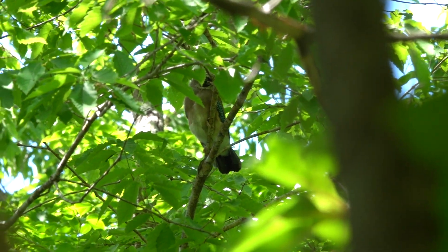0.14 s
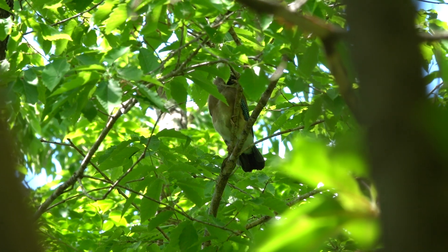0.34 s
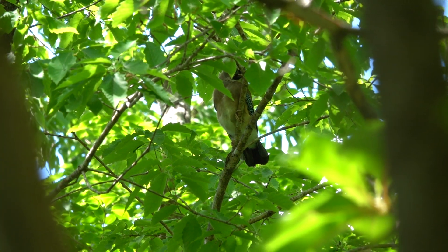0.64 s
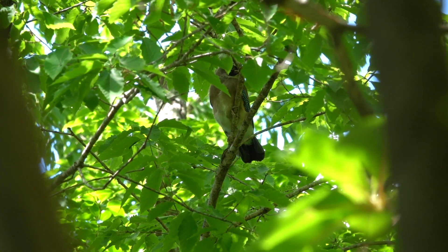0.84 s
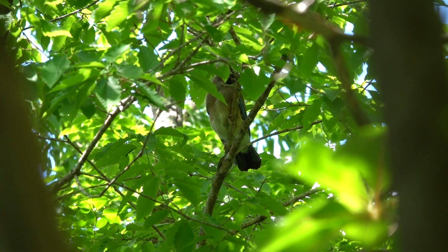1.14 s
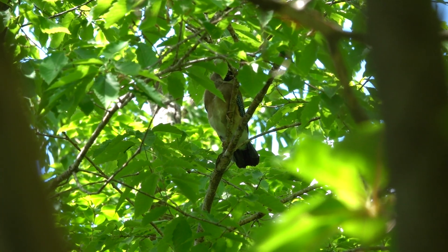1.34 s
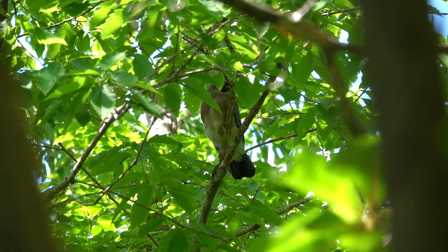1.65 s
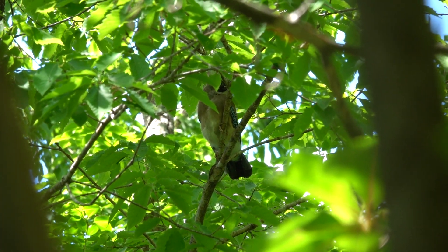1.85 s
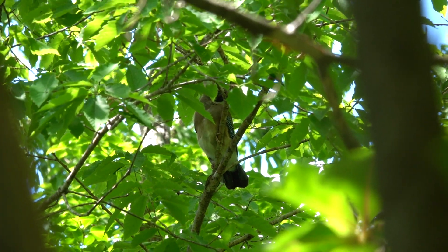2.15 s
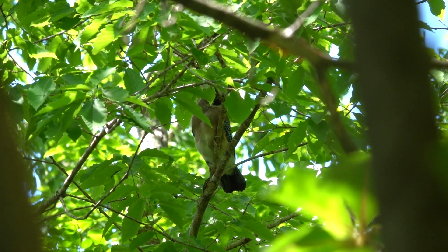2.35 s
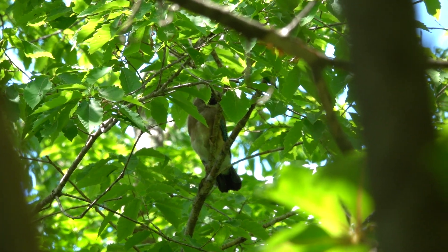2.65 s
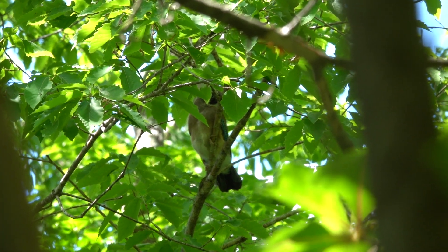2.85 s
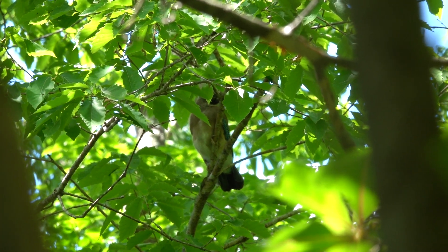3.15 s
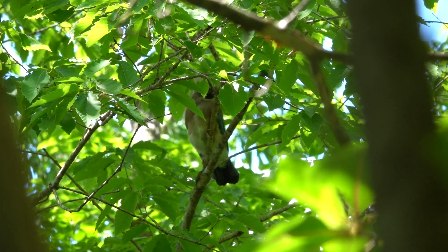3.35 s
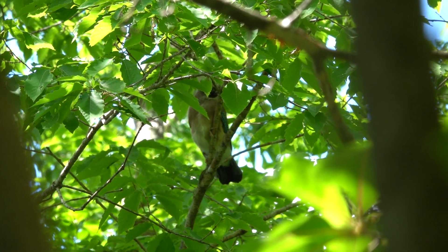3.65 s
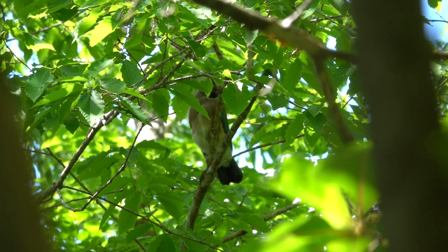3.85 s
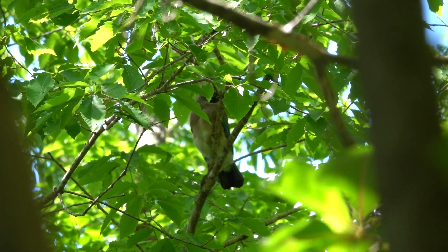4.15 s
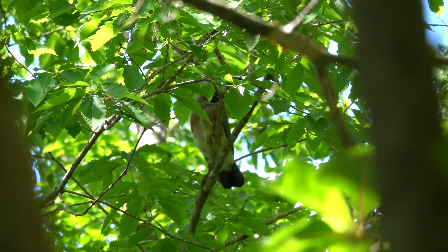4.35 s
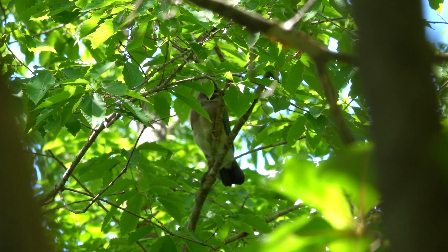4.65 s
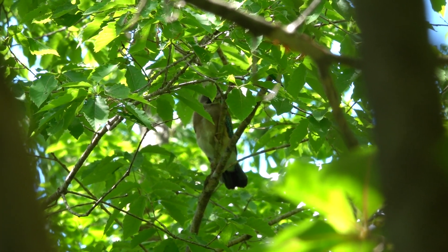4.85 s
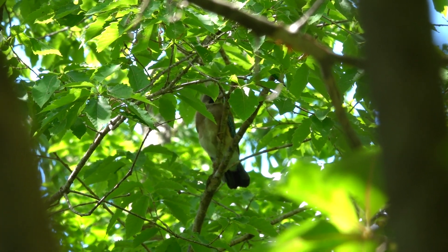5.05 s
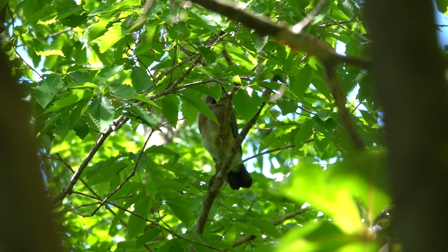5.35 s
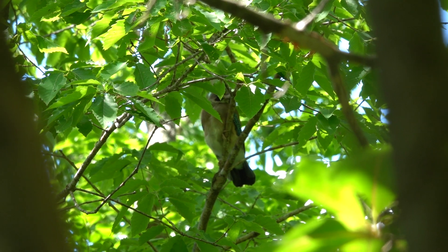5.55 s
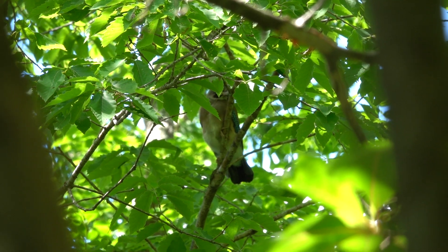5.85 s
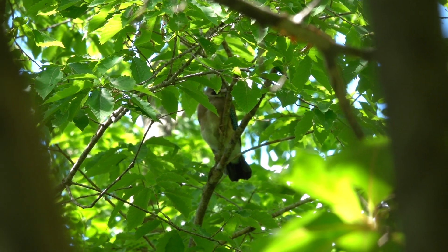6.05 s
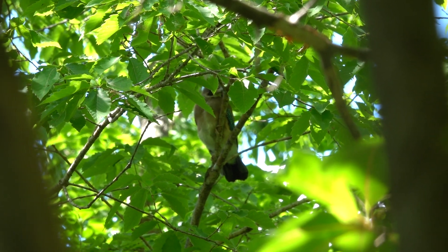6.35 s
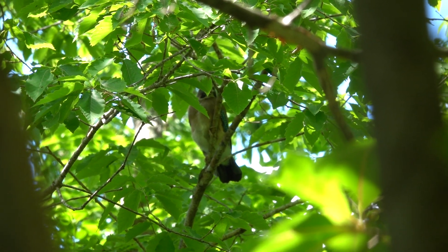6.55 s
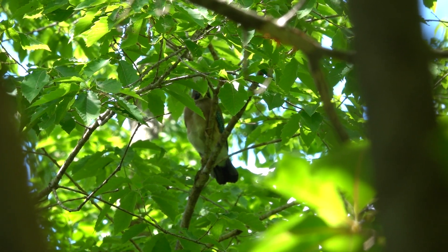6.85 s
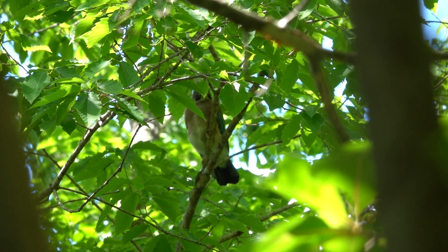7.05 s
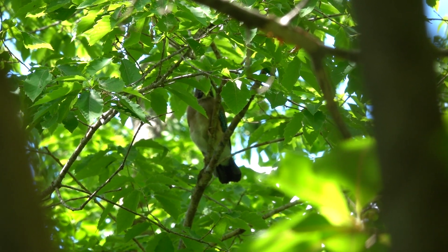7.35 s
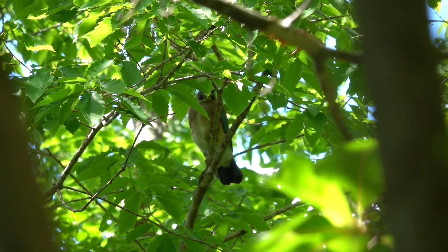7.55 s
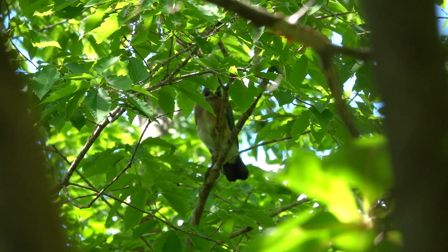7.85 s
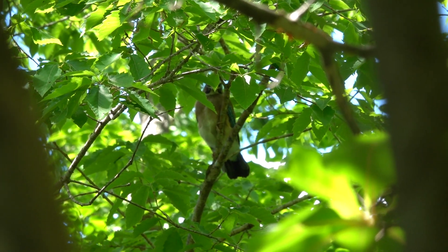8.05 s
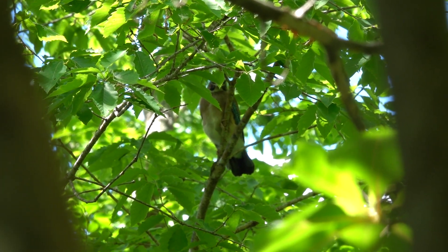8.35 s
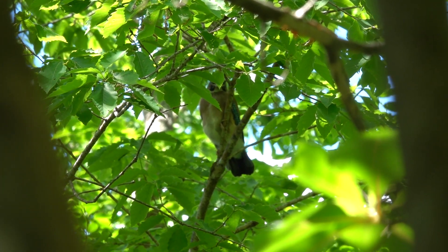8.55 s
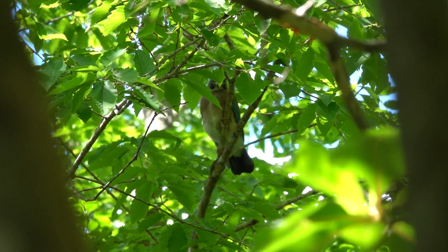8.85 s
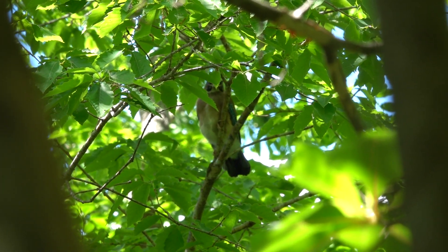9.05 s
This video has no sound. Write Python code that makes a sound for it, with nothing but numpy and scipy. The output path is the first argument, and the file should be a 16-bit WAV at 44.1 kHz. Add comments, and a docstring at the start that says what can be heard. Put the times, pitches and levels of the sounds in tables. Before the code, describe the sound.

A buzzing, throbbing cicada chorus fills the trees, strongest in the first five seconds, with thin far whistles and tiny bird chips behind.

```python
"""In a leafy wood, cicadas drone: two throb in the nearest trees and fade, a chorus carries on behind them.
Each song is a train of uneven clicks; bands of noise add its toneless rasp and a fine high sizzle.
Thin far whistles and a small bird's chips are short tones with a jittery pitch.
Scattered echoes from trunks and leaves smear cicadas, chorus, whistles and bird.
Shaped noise makes the drone of far insects, a faint outdoor rumble, a hum, soft low swells and a tick."""
import sys
import numpy as np
from scipy import signal
from scipy.fft import rfft, irfft, next_fast_len
from scipy.io import wavfile

SR = 44100
rng = np.random.default_rng(int(sys.argv[2]) if len(sys.argv) > 2 else 0)


def to_wav(sig):
    """Store sig (one row per channel, or 1-D mono) as 16-bit WAV at the path in sys.argv[1].

    Samples outside -1..1 are clipped; the rate is SR.
    """
    pcm = np.clip(np.atleast_2d(sig), -1, 1) * 32767
    pcm = np.round(pcm).astype(np.int16)
    wavfile.write(sys.argv[1], SR, pcm.T)  # frames by channels


N = 406161
T = np.arange(N) / SR  # time of every sample, in seconds


def undb(db):
    """Turn decibels into a plain gain."""
    return 10 ** (np.asarray(db) / 20)


def unit(x):
    """Scale to an average (rms) level of 1."""
    return x / np.sqrt(np.mean(x ** 2))


def curve(rows, axis=1):
    """One column of a table, joined by straight lines in time."""
    rows = np.array(rows)
    return np.interp(T, rows[:, 0], rows[:, axis])


def walk(rate):
    """Smooth random wandering around 0, about rate new values a second, with a spread near 1."""
    points = rng.standard_normal(N // 8)
    return 1.2 * np.interp(T * rate, np.arange(len(points)), points)


def cycle(hz):
    """Running phase, in radians, of a changing frequency."""
    return 2 * np.pi * np.cumsum(hz) / SR


def spread(pair, side_db):
    """Two unrelated signals as middle and side of a stereo pair."""
    middle, side = pair
    return middle + undb(side_db) * side * np.array([[1], [-1]])


def noise(gain, side_db):
    """Stereo noise of average level 1 whose spectrum is gain(Hz)."""
    size = next_fast_len(N, real=True)
    hz = np.maximum(np.fft.rfftfreq(size, 1 / SR), 1)
    spectrum = rfft(rng.standard_normal((2, size))) * gain(hz)
    pair = irfft(spectrum, size)[:, :N]
    return unit(spread(pair, side_db))


def coloured(points, side_db):
    """Noise whose spectrum joins (Hz, dB) points by straight lines over log frequency."""
    hz, db = np.transpose(points)
    return noise(lambda f: undb(np.interp(np.log(f), np.log(hz), db, left=-60, right=-60)), side_db)


def band(hz, width_hz, side_db):
    """Noise in one steep resonance."""
    return noise(lambda f: 1 / (1 + ((f - hz ** 2 / f) / width_hz) ** 2), side_db)


def swell(start, length, edge):
    """Samples of a note, its progress 0-1 and an envelope whose edges soften as edge grows."""
    at = np.flatnonzero((T > start) & (T < start + length))
    progress = (T[at] - start) / length
    return at, progress, np.abs(np.sin(np.pi * progress)) ** edge


def balance(db):
    """Left and right gains for a level difference (left minus right)."""
    return undb(db * np.array([[.5], [-.5]]))


def woods(x, t60, direct_db, side_db):
    """The straight path plus a dense scatter from trunks and leaves that dies by 60 dB in t60 seconds."""
    t = T[:SR]
    echo = spread(rng.standard_normal((2, SR)), side_db) * undb(-60 * t / t60)
    echo /= np.sqrt(np.sum(echo ** 2) / 2)
    echo[:, 0] += undb(direct_db)  # straight path, measured against the scatter
    echo /= np.sqrt(np.sum(echo ** 2) / 2)
    lead_in = np.pad(x, (SR // 2, 0), mode="reflect")  # the wood is already ringing
    return signal.fftconvolve(lead_in[None], echo, axes=1)[:, SR // 2:SR // 2 + N]


# what a cicada's body radiates at 1, 2, 3 and 4 times the click rate, before leaves dull it: relative level_db
BODY_LEVELS = [-25.5, 2.5, -19.5, -23]


def cicada(hz, throb, stroke_hz, jitter, waver, dull_db,
           stroke_depth=0.48, stroke_bend=0.032, throb_db=1.0, throb_bend=0.0033):
    """Tymbal ribs buckle in a quick uneven train; each muscle stroke makes the clicks louder and faster."""
    stroke = np.cos(cycle(stroke_hz * (1 + .09 * walk(120))))
    uneven = jitter * walk(700) + waver * walk(40)
    ribs = cycle(hz * (1 + stroke_bend * stroke + uneven + throb_bend * throb))
    turn, partial, tone = np.exp(1j * ribs), 1, 0
    for k, db in enumerate(BODY_LEVELS):
        partial = partial * turn  # next multiple of the click rate
        leaf_loss_db = dull_db * max(k - 1, 0)  # leaves take more of each higher partial
        tone = tone + undb(db - leaf_loss_db) * partial.imag
    loudness = undb(throb_db * throb + 1.6 * walk(110))
    return unit(tone * (1 + stroke_depth * stroke) * loudness)


# how fast the near cicadas' abdomens pump: time_s, throb_rate_hz
PUMPING = [(0.0, 8.39), (0.6, 10.02), (1.2, 8.42), (3.6, 8.19), (4.8, 10.33), (5.2, 7.99)]
THROB_START = -.067  # where they are in their throb at first, in cycles


def near_throb():
    """The abdomen pumps about 8-10 times a second; the near cicadas keep in step."""
    return np.cos(cycle(curve(PUMPING)) + 2 * np.pi * THROB_START)


# the two near cicadas, one fading as the other swells: time_s, click_rate_hz, level_db (before the wood's echo)
FIRST_SINGER = [(0, 1414, -35), (1.5, 1418, -30.5), (2.1, 1424, -44), (2.8, 1443, -37), (5.2, 1420, -39)]
SECOND_SINGER = [(0, 1474, -34), (1.9, 1473, -34), (3, 1470, -29.7), (4, 1475, -24.8), (5.2, 1486, -37),
                 (9.2, 1480, -43)]


def near_cicadas(throb):
    """Two singers in the nearest crowns, each with its own click rate and muscle strokes."""
    first = cicada(curve(FIRST_SINGER), throb, stroke_hz=280, jitter=.014, waver=.006, dull_db=4)
    second = cicada(curve(SECOND_SINGER), throb, stroke_hz=288, jitter=.010, waver=.0045, dull_db=1)
    first = first * undb(curve(FIRST_SINGER, axis=2))
    second = second * undb(curve(SECOND_SINGER, axis=2))
    return woods(first + second, t60=.25, direct_db=0, side_db=-5)


# loudness of the whole chorus: time_s, level_db
CHORUS_LEVEL = [(0, -34), (2, -27.5), (4, -32), (5.5, -33.5), (9.2, -33)]
# the singers of the chorus, one number each: average click_rate_hz
CHORUS_CLICK_RATES = [1385, 1412, 1435, 1454, 1461, 1487, 1486, 1493.5, 1545]
THROB_HZ = 8.6  # average throbs a second in the chorus


def chorus():
    """Many singers further off, each clicking at its own wandering pitch and pulse."""
    song = 0
    for hz in CHORUS_CLICK_RATES:
        throb_rate = THROB_HZ * (1 + 0.1202 * walk(1.5))
        throb = np.cos(cycle(throb_rate) + rng.uniform(0, 2 * np.pi))
        pitch = hz * (1 + .003 * walk(1.2))
        song = song + cicada(pitch, throb, stroke_hz=263.3, jitter=.017, waver=.006, dull_db=5.0)
    song = woods(unit(song), t60=.6, direct_db=-7, side_db=-5.5)
    return song * undb(curve(CHORUS_LEVEL))


# the throb bites deepest at one moment: when, half-length and depth
PULSING_S, PULSING_WIDTH_S, PULSING_DB = 2.8, 0.77, 3


def pulsing(throb):
    """Swing in dB that the throb gives the treble: it deepens towards one moment and eases off."""
    return PULSING_DB * throb / (1 + ((T - PULSING_S) / PULSING_WIDTH_S) ** 2)


# loudness of the upper buzz, before RASP_DB is added: time_s, relative level_db
RASP_LEVEL = [(0.0, -50.5), (1.69, -45), (2.02, -48), (4.53, -49.5), (5.79, -58), (7.89, -60), (9.2, -57.5)]
# the body's upper resonances: centre_hz, width_hz, relative level_db
BODY_RESONANCES = [(4380, 530, -2), (5936, 710, 1.5), (7500, 810, -2.5), (8990, 870, -6),
                   (10450, 650, -10.5), (11860, 500, -18)]
RASP_DB = 2  # lifts the whole rasp


def rasp(throb):
    """The toneless edge of the clicks rings the body's upper resonances, pulsing with the song."""
    ring = sum(undb(db) * band(hz, width, side_db=-2.5) for hz, width, db in BODY_RESONANCES)
    strokes = 1 + 0.17 * np.cos(cycle(283 * (1 + 0.0534 * walk(60))))
    return unit(ring) * strokes * undb(RASP_DB + curve(RASP_LEVEL) + pulsing(throb))


# loudness of the fine top treble, before SIZZLE_DB is added: time_s, relative level_db
SIZZLE_LEVEL = [(0.0, -52.5), (1.1, -51.5), (3.18, -51.5), (3.28, -53.5), (4.59, -55.5), (4.79, -58),
                (7.02, -65.5), (9.2, -57.5)]
# tone colour of the sizzle: frequency_hz, relative level_db
SIZZLE_TONE = [(3500, 3.5), (5200, 0.5), (6100, 1), (6830, -4), (7550, -1), (8380, -7.5), (9000, -6.5),
               (9750, -1.5), (10500, 0.5), (11900, -0.5), (13700, -7), (14500, -13), (15500, -16)]
SIZZLE_DB = 5  # lifts the whole sizzle


def sizzle(throb):
    """Fine high hiss of insects in the foliage, as noise; it pulses lightly with the near song."""
    level_db = SIZZLE_DB + curve(SIZZLE_LEVEL) + 0.32 * pulsing(throb) + 0.26 * walk(9)
    return coloured(SIZZLE_TONE, side_db=-5.0) * undb(level_db)


# loudness of the drone of far insects, before FAR_DB is added: time_s, relative level_db
FAR_LEVEL = [(0.0, -44), (4.25, -46), (4.66, -46), (7.51, -47.5), (8.43, -43.5), (8.56, -48.5), (9.2, -43)]
# tone colour of that drone: frequency_hz, relative level_db
FAR_TONE = [(1000, -22), (1150, -12.5), (1280, -3), (1420, 1), (1650, 0), (1850, -6), (2150, 6),
            (2400, -1.5), (2900, 1), (3400, -13), (3750, -11.5), (4350, -13.5), (5100, -39)]
FAR_DB = 6  # lifts the whole drone


def far_insects():
    """Countless distant singers merge into a drone, made as noise with a gently wavering level."""
    return coloured(FAR_TONE, side_db=-6.5) * undb(FAR_DB + curve(FAR_LEVEL) + 0.18 * walk(8.6))


# far whistles: start_s, length_s, middle pitch_hz, peak level_db (before the wood's echo)
WHISTLE_NOTES = [(0, .44, 2208, -29.5), (.3, .42, 2125, -38), (.92, .38, 2215, -38),
                 (1.5, .54, 2195, -27.5), (2.2, .5, 2175, -38), (3.35, .29, 2243, -38),
                 (4.4, .58, 2258, -40), (5.1, .75, 2235, -37), (6.08, .47, 2025, -44), (6.6, .6, 2190, -40),
                 (7.35, .85, 2185, -37.5), (7.95, .47, 2055, -42), (8.75, .45, 2252, -38.5),
                 (8.95, .4, 2160, -33.5)]
# a whistle at this pitch holds level; a lower one sags by this share of its shortfall, a higher one rises
WHISTLE_FULL_HZ, WHISTLE_SAG = 2213, 0.432


def whistles():
    """Long quavering notes from deep in the wood: tones whose pitch glides and trembles."""
    out = np.zeros(N)
    quaver = 1 + .011 * walk(400) + .007 * walk(35)
    for start, length, hz, db in WHISTLE_NOTES:
        at, progress, shape = swell(start, length, edge=0.53)
        pitch = hz + WHISTLE_SAG * (WHISTLE_FULL_HZ - hz) * (.5 - progress)
        out[at] += undb(db) * shape * np.sin(cycle(pitch * quaver[at]))
    return woods(out, t60=.3, direct_db=1, side_db=-4)


# bird chips: start_s, length_s, peak level_db (before the wood's echo)
CHIP_NOTES = [(0.491, .076, -37), (0.57, 0.058, -34.5), (0.795, 0.057, -35.5), (1.343, 0.056, -40),
              (2.079, 0.067, -30), (2.84, .059, -40), (5.728, 0.17, -45), (5.891, 0.18, -44.5),
              (6.92, 0.095, -46), (7.248, 0.092, -47), (7.556, 0.0608, -45), (7.959, 0.21, -44),
              (8.26, .17, -44.5), (8.55, 0.13, -43)]
CHIP_HZ = 4147  # pitch halfway through a chip


def bird():
    """Short chips that fall in pitch; quick random jitter of the pitch makes them harsh."""
    out = np.zeros(N)
    harsh = 1 + 0.0634 * walk(1100)
    for start, length, db in CHIP_NOTES:
        at, progress, shape = swell(start, length, edge=0.4)
        pitch = CHIP_HZ * (1 + 0.084 * (.5 - progress))
        out[at] += undb(db) * shape * np.sin(cycle(pitch * harsh[at]))
    return woods(out, t60=0.33, direct_db=-3.0, side_db=0.5)


# tone colour of the deep rumble, and of the outdoor air above it: frequency_hz, relative level_db
RUMBLE_TONE = [(20, -10), (45, -9), (80, -4.5), (160, -5.5), (300, -5.5), (500, -24)]
AIR_TONE = [(140, -7.5), (250, -2), (400, 1.5), (750, -0.5), (950, 2.5), (1150, -5), (2000, -7.5),
            (5000, -11.5)]
# faint far hum: centre_hz, width_hz, level_db
HUM_BANDS = [(49.4, 5.9, -70), (129.7, 6.8, -67.5), (864, 21, -68.5)]
# soft low swells: start_s, length_s, centre_hz, width_hz, level_db
LOW_SWELLS = [(.85, 0.53, 332, 300, -59), (3.4, 0.43, 450, 500, -58.5), (5.83, .18, 390, 220, -57.5),
              (8.215, 0.35, 350, 160, -55.5)]
# one small tick: start_s, length_s, centre_hz, width_hz, level_db
SMALL_TICK = (3.869, .017, 700, 1300, -45)


def ground():
    """Low rumble, air, hum, a few soft swells and a tick, all made of noise in chosen bands."""
    bass = coloured(RUMBLE_TONE, side_db=-42) * undb(-63.5)
    air = coloured(AIR_TONE, side_db=-9) * undb(-53.5 + 0.29 * walk(4.3))
    hum = sum(band(hz, width, side_db=-17) * undb(db) for hz, width, db in HUM_BANDS)
    out = bass + air + hum
    for start, length, hz, width, db in LOW_SWELLS + [SMALL_TICK]:
        at, _, shape = swell(start, length, edge=0.3)
        out[:, at] += undb(db) * shape * band(hz, width, side_db=-24)[:, at]
    return out


# where the song sits between left and right: time_s, left minus right level_db
SONG_PAN = [(0, .8), (1.7, .8), (2.2, -.5), (9.2, -1.9)]


def scene():
    """The singers drift from left of centre to the right; the treble leans left."""
    throb = near_throb()
    song = (near_cicadas(throb) + chorus()) * balance(curve(SONG_PAN))
    treble = (rasp(throb) + sizzle(throb)) * balance(0.92)
    return song + treble + far_insects() + whistles() + bird() + ground()


TOP_HZ = 15600  # highest pitch let through


def record(dry):
    """A steep low-pass filter cuts the very top of the treble."""
    return signal.sosfilt(signal.ellip(10, .2, 80, TOP_HZ, fs=SR, output="sos"), dry)


dry = scene()
out = record(dry)
to_wav(out)
```